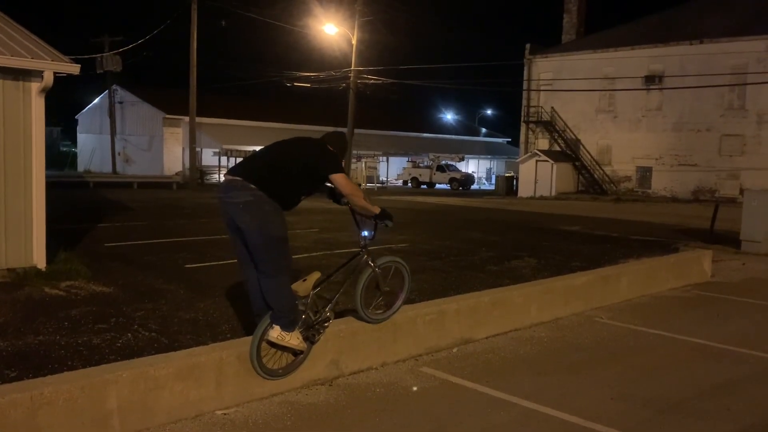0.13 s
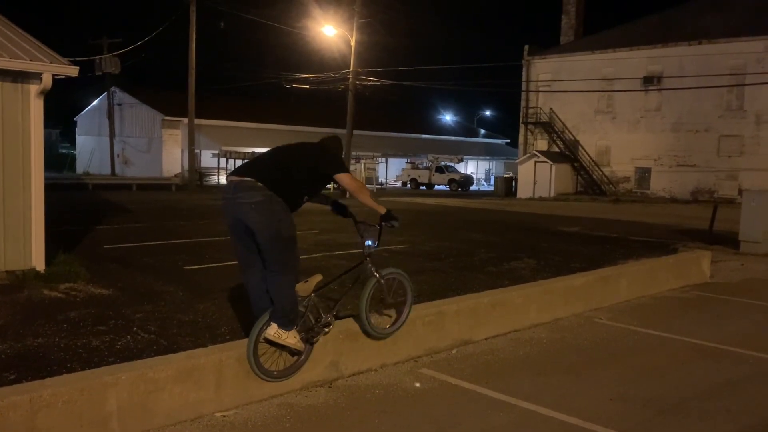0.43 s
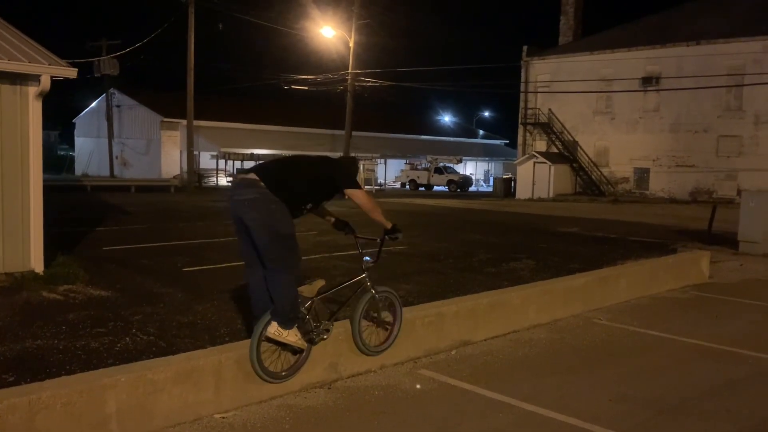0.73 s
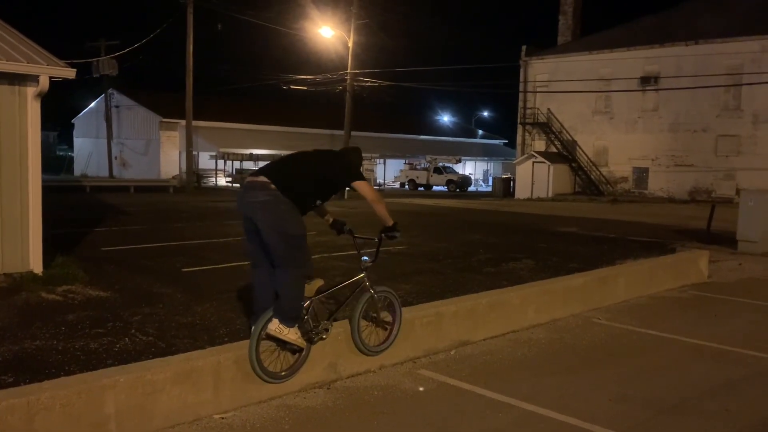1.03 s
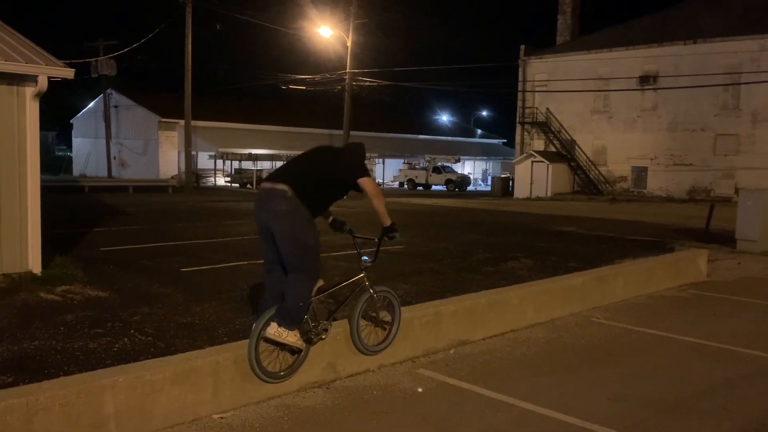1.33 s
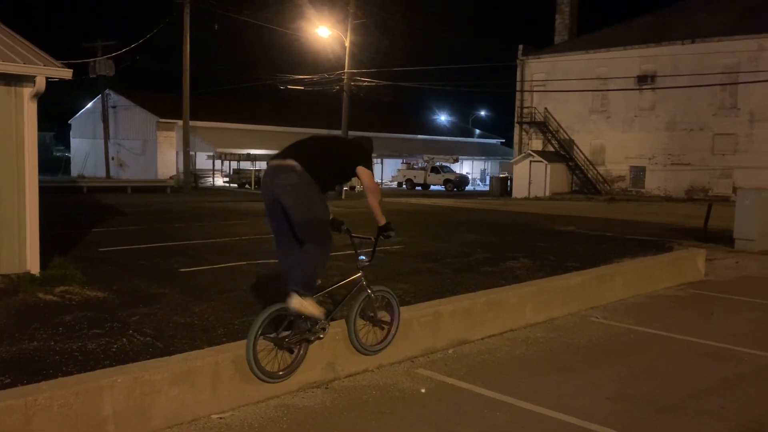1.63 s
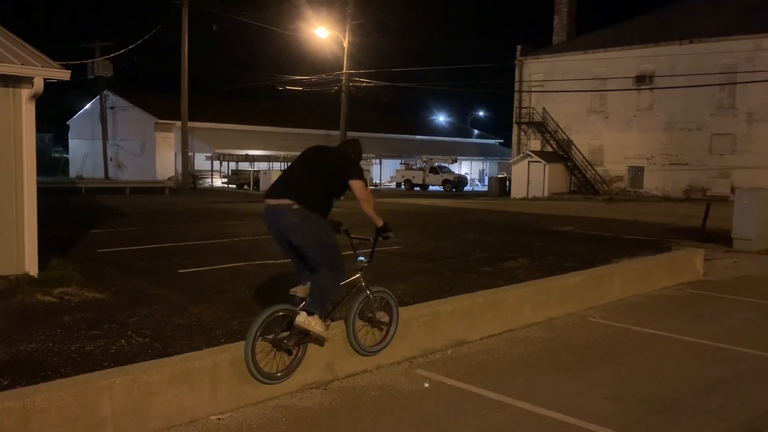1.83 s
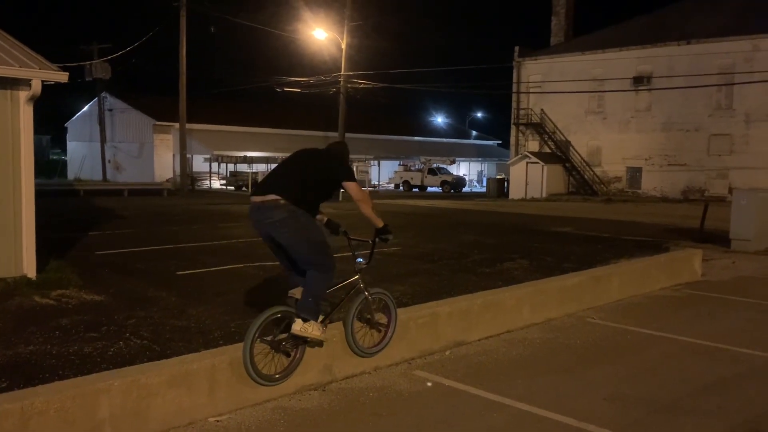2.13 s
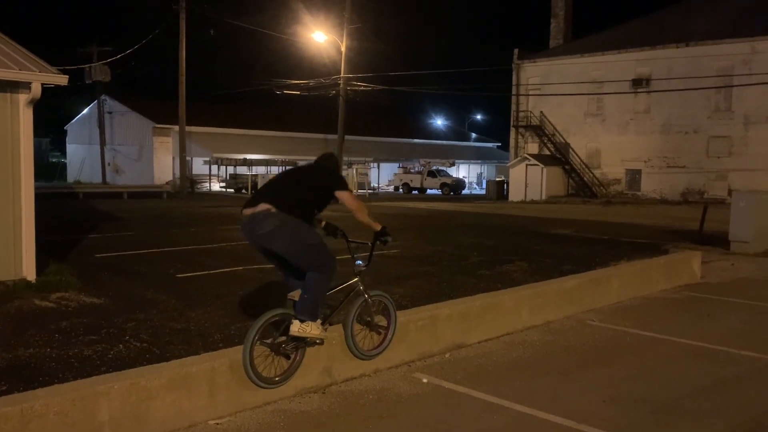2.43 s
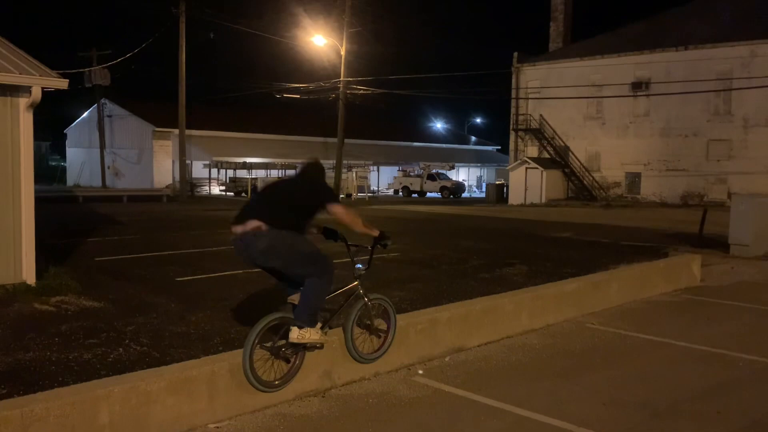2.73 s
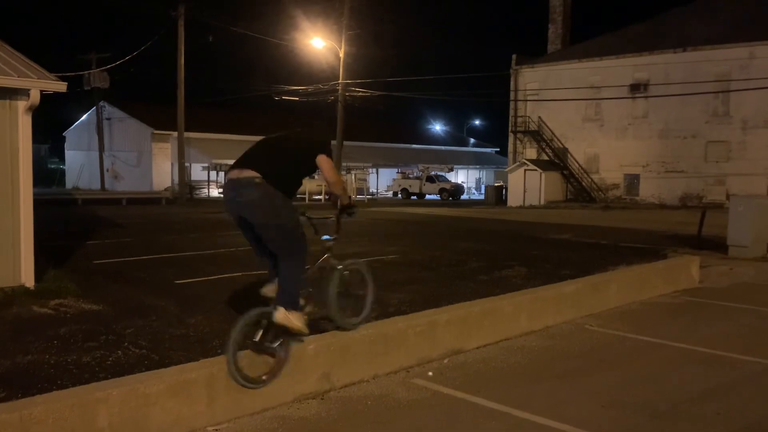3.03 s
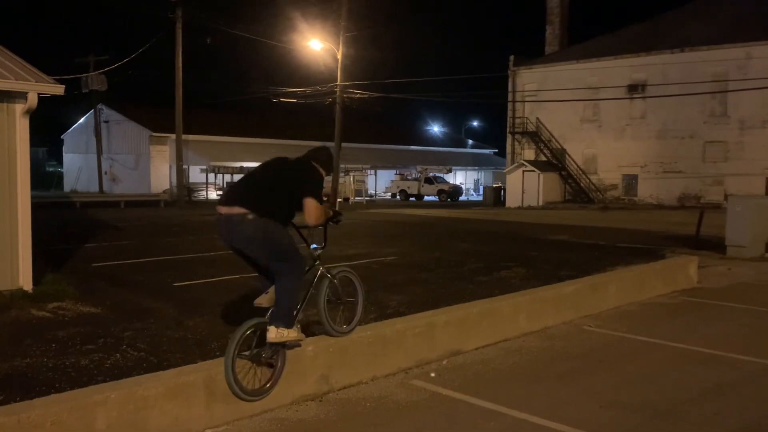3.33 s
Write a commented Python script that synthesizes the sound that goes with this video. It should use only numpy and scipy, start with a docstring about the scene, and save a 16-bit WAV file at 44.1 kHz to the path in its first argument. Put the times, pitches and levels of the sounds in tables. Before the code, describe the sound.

A bicycle knocks down on concrete three main times, tyres thumping and chain and spokes rattling, with small rubber squeaks and scuffs between. The last landing is hardest and rings faintly. Dull outdoor echoes and far traffic sit behind.

```python
"""Thumps, knocks and rattles: a BMX bike hops on a concrete curb in an empty parking lot at night.
Each contact thumps the tyre, knocks the frame and shakes the chain and spokes; the last landing
sets the steel ringing. The rubber judders and squeaks as it grips and slips, and scuffs on grit.
Buildings throw back dull echoes, and the town rumbles far off."""
import sys
import numpy as np
from scipy import signal
from scipy.fft import rfft, irfft, next_fast_len
from scipy.io import wavfile

SR = 44100
rng = np.random.default_rng(int(sys.argv[2]) if len(sys.argv) > 2 else 0)


def transcribe(u):
    """Save the signal u as a 16-bit wav file named by the first command-line argument.

    u: samples, shape (n,) or (channels, n), limited to [-1, 1]; the rate is SR.
    q: integer samples, one column per channel.
    """
    v = np.clip(np.atleast_2d(u).T, -1, 1)
    q = np.round(v * 32767).astype(np.int16)
    wavfile.write(sys.argv[1], SR, q)


N = 154350
T = np.arange(N) / SR
RATTLE_DECAY_S = 0.031  # how quickly loose parts settle

# The pitches at which each part of the bike rings: f/Hz, width/Hz, level/dB
TYRE = [(125, 55.4, -1), (198, 55, 4), (325, 30.5, 3.5), (383, 42, -6)]
FRAME = [(798, 160, -1.5), (815, 118, 5), (947, 160, -4.5), (1161, 160, -0.5), (1320, 120, -1),
         (1534, 187, -2)]
FORK = [(1821, 160, -4), (2123, 200, 0.5), (2370, 395, 3), (3010, 380, -2.5), (3624, 510, -0.5),
        (4270, 920, -7.5)]
CHAIN = [(6370, 3600, -4), (6930, 570, 2), (7290, 170, 3), (9810, 640, 1), (10220, 210, 5), (11000, 960, 2),
         (12480, 420, 3), (14900, 2900, -5)]


def contacts(attack_s=0.000057, clicks_per_s=8100, rattles_per_s=500, rattle_db=-23, spokes_db=-17.5):
    """Each contact is a burst of tiny collisions, then a dying rattle, heard through each bike part."""
    # The bike meets the concrete: t/s, tyre/dB, frame/dB, fork/dB, chain/dB, decay/ms
    hits = [(0.576, -33.5, -44, -33.5, -45.5, 1.1), (0.585, -40, -46, -43, -40, 6.1),
            (0.669, -22, -29.5, -32.5, -35.5, 3.2), (0.677, -27, -70, -44, -41.5, 29),
            (0.701, -30, -56, -40, -46.5, 6.5), (0.895, -43.5, -61, -56, -50, 9.4),
            (0.9233, -46.5, -49, -43, -40, 3.7), (0.953, -66, -67, -51.5, -68, 5.6),
            (1.189, -52, -60, -67, -61, 13), (1.460, -42, -44, -43.5, -40.5, 1.2),
            (1.587, -45, -56, -62, -49.5, 3.7), (1.711, -56, -40, -66, -48, 2.6),
            (1.7242, -25.5, -31.5, -35, -29.5, 3.8), (1.76, -51, -38.5, -55, -48, 2.9),
            (1.786, -66, -62, -51, -47, 45), (2.3356, -50.5, -52.5, -69.5, -69, 1.3),
            (2.949, -48.5, -60.5, -78, -49, 4.6), (3.040, -42.5, -36, -34.5, -42.5, 6.3),
            (3.122, -56.5, -37, -37.5, -37, 2.4), (3.156, -23, -26.5, -31.5, -25, 4),
            (3.1712, -21, -25, -24.5, -24, 7.5), (3.209, -56, -39, -36.5, -52, 14),
            (3.3372, -46, -58, -46.5, -67, 29)]
    out, t = np.zeros(N), T[:SR // 5]
    loose = from_db(rattle_db) * np.exp(-t / RATTLE_DECAY_S)
    for start, *levels, decay_ms in hits:
        blow = (1 - np.exp(-t / attack_s)) * np.exp(-t * 1000 / decay_ms)
        for db, part in zip(levels, (TYRE, FRAME, FORK, CHAIN)):
            # No two hits have quite the same tone.
            modes = [(hz, width, gain + 2 * rng.standard_normal()) for hz, width, gain in part]
            force = blow * clicks(clicks_per_s, len(t)) + loose * clicks(rattles_per_s, len(t))
            knock = resonate(force, modes)
            strength = np.sqrt(np.sum(knock ** 2) / (0.01 * SR))  # as if packed into 10 ms
            add(out, start, from_db(db) * knock / strength)
        add(out, start, from_db(levels[-1] + spokes_db) * spokes())  # follows the chain's level
    return out


def tyres(roughness=0.086):
    """The air-filled tyres bounce under load and judder on the curb's edge."""
    # The rider's weight lands on a tyre: t/s, level/dB, f/Hz, time to fade by 60 dB/s
    bounces = [(0.586, -31, 86.8, 0.32), (0.676, -27.5, 78.7, 0.18), (1.726, -38, 151.5, 0.08),
               (1.955, -30.5, 66.2, 0.15), (3.133, -25.5, 104.2, 0.1), (3.173, -16, 100.5, 0.17),
               (3.233, -33.5, 96.2, 1)]
    # Rubber grips and slips: t/s, level/dB, slip rate/Hz
    judder = [(0.262, -31.5, 129), (0.287, -28, 89), (0.314, -27, 59), (0.338, -37, 62), (0.36, -65, 32)]
    out = np.zeros(N)
    for start, db, hz, fade_s in bounces:
        add(out, start, from_db(db) * dying_sine(hz, fade_s))
    times, db, rate = np.transpose(judder)
    slip_hz = np.interp(T, times, rate) * (T > times[0])
    slips = np.sin(2 * np.pi * np.cumsum(slip_hz) / SR)
    friction = rms_one(resonate(rng.standard_normal(N), TYRE))
    loudness = np.interp(T, times, from_db(db), left=0, right=0)
    return out + loudness * (slips + roughness * friction)


def steel(tube_hz=2941, beat_hz=3.5, flutter_db=5, flutters_per_s=100):
    """Hard blows leave thin ringing tones that flutter as the frame shakes."""
    # The tones of steel tubes and pegs: f/Hz, level/dB, time to fade by 60 dB/s
    tones = [(6971, -2, .26), (7318, -6, .23), (8200, -6, .2), (9189, -8, .29), (10531, 1, .12),
             (10822, -9, .14), (11094, -10, .14), (12215, -9, .16), (15257, -13, .16)]
    # Blows that reach the steel: t/s, level/dB
    blows = [(3.1727, -27), (3.209, -39.5)]
    out = np.zeros(N)
    beating = np.sin(np.pi * beat_hz * T[:SR])  # the lowest ring is two close tones: it swells and fades
    tube = from_db(0.5) * dying_sine(tube_hz, fade_s=0.55) * beating
    modes = [tube] + [from_db(db) * dying_sine(hz, fade_s) for hz, db, fade_s in tones]
    for start, db in blows:
        for mode in modes:
            add(out, start, from_db(db + flutter_db * waver(flutters_per_s, SR)) * mode)
    return out


def clinks(count=5, pitch_spread=0.092, fade_s=0.1):
    """Short clusters of close tones ring with some knocks."""
    # Tone clusters (the one at 1.726 s is the knock's low frame tone): t/s, middle f/Hz, level/dB
    clusters = [(0.576, 2550, -27), (0.586, 2943, -31), (0.671, 2057, -28), (1.726, 809, -32.5)]
    out = np.zeros(N)
    for start, middle_hz, db in clusters:
        pitches = middle_hz * (1 + pitch_spread * rng.uniform(-1, 1, count))
        cluster = sum((-1) ** k * dying_sine(hz, fade_s) for k, hz in enumerate(pitches))
        add(out, start, from_db(db) * cluster / np.sqrt(count))
    return out


def spokes(count=22, low_hz=3150, high_hz=14900, fade_s=0.17):
    """Spokes and chain links jingle, different ones at every contact."""
    pitch, size, lateness = rng.random((3, count, 1))
    t = np.maximum(T[:SR // 4] - lateness ** 2 * RATTLE_DECAY_S, 0)
    hz = low_hz + pitch * (high_hz - low_hz)
    pings = size ** 2 * np.sin(2 * np.pi * hz * t) * from_db(-60 * t / fade_s)
    return np.sum(pings, axis=0) / np.sqrt(np.sum(size ** 4) / 2)


def scuffs(grains_per_s=1800, rise_share=0.36):
    """Grit cracks under a sliding tyre."""
    # Short slides: t/s, length/s, crunch/dB, fine grit/dB
    slides = [(0.563, 0.062, -39, -47), (1.698, 0.035, -56, -59), (2.777, .06, -59.5, -64.5),
              (2.831, 0.045, -42.5, -56), (2.849, 0.06, -41, -47), (2.881, 0.094, -66, -59.5),
              (3.03, 0.059, -36, -48)]
    out, t = np.zeros(N), T[:SR // 5]
    for start, length, crunch_db, fine_db in slides:
        grit = clicks(grains_per_s, len(t))
        crunch = rms_one(from_db(-3) * resonate(grit, FRAME) + resonate(grit, FORK))
        fine = rms_one(resonate(grit, CHAIN))
        push = np.interp(t / length, [0, rise_share, 1], [0, 1, 0])
        add(out, start, push * (from_db(crunch_db) * crunch + from_db(fine_db) * fine))
    return out


def squeaks(wobble=0.022, wobbles_per_s=900):
    """Rubber sticks and slips fast: a rough, gliding tone that swells and fades."""
    # Rubber squeaks: t/s, length/s, start f/Hz, end f/Hz, peak level/dB
    glides = [(0.732, 0.015, 1340, 1340, -42.5), (1.463, 0.026, 1740, 2150, -40),
              (1.549, 0.016, 1333, 1410, -45.5), (2.335, 0.14, 5150, 4680, -70),
              (2.465, 0.051, 4320, 4700, -66.5), (2.517, .08, 4550, 4660, -65.5)]
    out = np.zeros(N)
    for start, length, start_hz, end_hz, db in glides:
        size = int(length * SR)
        hz = np.linspace(start_hz, end_hz, size) * (1 + wobble * waver(wobbles_per_s, size))
        swell = np.sin(np.linspace(0, np.pi, size))
        add(out, start, from_db(db) * swell * np.sin(2 * np.pi * np.cumsum(hz) / SR))
    return out


def tyre_drag():
    """A tyre rubs slowly along the edge as the rider shifts his weight."""
    # How loud the rubbing is: t/s, body/dB, lower hiss/dB, upper hiss/dB
    drag = [(1.08, -88, -95, -82.5), (1.18, -70, -83.5, -70), (1.46, -54.5, -72, -66),
            (1.58, -59, -69.5, -82), (1.7, -74, -79.5, -95)]
    # The pitches of the rubbing's body and of its two hisses: f/Hz, width/Hz, level/dB
    body = [(1360, 68, -5), (2086, 180, -3)]
    hisses = [(4600, 210, 0), (6340, 190, 0)]
    times, *levels = np.transpose(drag)
    out, friction = np.zeros(N), rng.standard_normal(N)
    for db, part in zip(levels, (body, hisses[:1], hisses[1:])):
        loudness = np.interp(T, times, from_db(db), left=0, right=0)
        out += loudness * rms_one(resonate(friction, part))
    return out


def concrete_scatter(sound, level_db=-6.5, decay_s=0.0059, above_hz=920):
    """Rough concrete throws back the treble of each knock at once, differently left and right."""
    spray = rng.standard_normal((2, SR // 10)) * np.exp(-T[:SR // 10] / decay_s)
    spray = signal.sosfilt(high_pass(above_hz), spray)
    spray = from_db(level_db) * spray / np.sqrt(np.sum(spray ** 2) / 2)
    return signal.fftconvolve(sound[None], spray, axes=1)[:, :N]


def parking_lot(sound, stereo_db=-5, build_up_s=0.0077):
    """Ground and walls return two clear echoes and a soft tail that lasts longest at middle pitches."""
    # Echoes off the ground and walls: delay/s, level/dB
    echoes = [(.031, -18.5), (.074, -24.5)]
    # The lot's tail of blurred echoes: f/Hz, level/dB, time to fade by 60 dB/s
    tail = [(150, -17, 0.17), (800, -10.5, 0.26), (1550, -15.5, 0.72), (3100, -18.5, 0.82),
            (5930, -19.5, 0.42), (12100, -35, 0.26)]
    t, response = T[:SR], np.zeros((2, SR))
    edges_hz = np.geomspace(70, 17000, 9)
    for low, high in zip(edges_hz, edges_hz[1:]):
        hz = np.sqrt(low * high)
        fade = (1 - np.exp(-t / build_up_s)) * from_db(-60 * t / at_hz(tail, hz, column=2))
        noise = rms_one(rng.standard_normal(SR) + from_db(stereo_db) * rng.standard_normal((2, SR)))
        band = signal.sosfilt(signal.butter(2, [low, high], "band", fs=SR, output="sos"), noise)
        response += from_db(at_hz(tail, hz)) * band * fade / np.sqrt(np.sum(fade ** 2))
    for delay, db in echoes:
        response[:, int(delay * SR)] += from_db(db)
    return signal.fftconvolve(sound[None], response, axes=1)[:, :N]


def town(rumble_db=-45, stereo_db=-4.5, wash_above_hz=167):
    """Far traffic makes a steady rumble, with a faint wash above it that rises and falls."""
    # The traffic's tone from bass to treble: f/Hz, relative level/dB
    spectrum = [(22, -16), (40, 1), (70, -0.5), (120, 2), (180, -10.5), (260, -21.5), (380, -21),
                (600, -31), (1700, -41), (3000, -52), (6000, -63), (10500, -59.5), (16000, -62.5)]
    # How much the wash is turned up: t/s, boost/dB
    swells = [(0, 6.5), (.48, 0), (.9, 8.5), (1.9, 7), (2.3, 4.5), (3.5, 10.5)]
    hz = np.arange(N // 2 + 1) * SR / N
    noise = rng.standard_normal(N) + from_db(stereo_db) * rng.standard_normal((2, N))
    shaped = irfft(rfft(noise) * from_db(at_hz(spectrum, hz)), N)
    traffic = from_db(rumble_db) * rms_one(shaped)
    wash = signal.sosfiltfilt(high_pass(wash_above_hz), traffic)
    boost = from_db(np.interp(T, *np.transpose(swells)))
    return traffic + wash * (boost - 1)


def from_db(db):
    """Turn decibels into a number to multiply by."""
    return 10 ** (np.asarray(db) / 20)


def rms_one(sound):
    """Scale a sound so that its average strength (rms) is 1."""
    return sound / np.sqrt(np.mean(sound ** 2) + 1e-20)


def at_hz(table, hz, column=1):
    """Read between a table's rows at any pitch, with octaves evenly spaced."""
    table = np.array(table)
    return np.interp(np.log(np.maximum(hz, 1)), np.log(table[:, 0]), table[:, column])


def add(out, start_s, sound):
    """Mix a sound in at a given time."""
    i = int(start_s * SR)
    out[i:i + len(sound)] += sound[:max(N - i, 0)]


def high_pass(hz):
    """A filter that weakens everything below a pitch."""
    return signal.butter(2, hz, "high", fs=SR, output="sos")


def resonate(force, modes):
    """Shake a part so that it rings at its own pitches (modes); every second one is flipped in sign."""
    out = 0
    for k, (hz, width, db) in enumerate(modes):
        decay = np.exp(-np.pi * width / SR)
        feed = np.array([1, 0, -1]) * (1 - decay ** 2) / 2
        feedback = [1, -2 * decay * np.cos(2 * np.pi * hz / SR), decay ** 2]
        out = out + (-1) ** k * from_db(db) * signal.lfilter(feed, feedback, force + 1e-18)
    return out


def clicks(per_s, size, uneven_db=5.5):
    """Random clicks, most weak and a few strong."""
    strength = from_db(uneven_db * np.minimum(rng.exponential(1, size), 4))
    sign = rng.choice([-1, 1], size)
    return rms_one(strength * sign * (rng.random(size) < per_s / SR))


def dying_sine(hz, fade_s):
    """One struck tone that drops by 60 dB in fade_s."""
    t = T[:SR]
    return np.sin(2 * np.pi * hz * t) * from_db(-60 * t / fade_s)


def waver(per_s, size):
    """A value that wanders at random around zero."""
    points = rng.standard_normal(int(size / SR * per_s) + 2)
    return np.interp(np.arange(size) / SR * per_s, np.arange(len(points)), points)


def scene(ring_echo_db=-5):
    """The bike, its echoes and the night around it."""
    knocks = contacts() + clinks() + scuffs() + squeaks() + tyre_drag()
    bounces, rings = tyres(), steel()
    echoes = parking_lot(knocks + bounces + from_db(ring_echo_db) * rings)
    return knocks + concrete_scatter(knocks) + bounces + rings + echoes + town()


def record(dry, low_cut_hz=43, high_cut_hz=15900):
    """The microphone's two openings hear the waves out of step; deep bass and top treble are cut."""
    # How far the left opening is ahead of the right: f/Hz, phase/rad
    left_lead = [(20, 0), (65, .5), (130, 1.7), (260, 2.5), (380, 4.2), (520, 7.0), (2000, 7.9),
                 (3300, 9.3), (4800, 9.2), (6000, 6.8), (8900, 2.6), (15200, -5.6)]
    size = next_fast_len(N + SR // 2)
    lead = at_hz(left_lead, np.arange(size // 2 + 1) * SR / size)
    shift = np.exp(1j * np.outer([.5, -.5], lead))  # half to each side
    heard = irfft(rfft(dry, size) * shift, size)[:, :N]
    heard = signal.sosfilt(high_pass(low_cut_hz), heard)
    return signal.sosfilt(signal.cheby1(12, .2, high_cut_hz, fs=SR, output="sos"), heard)


dry = scene()
out = record(dry)
transcribe(out)
```